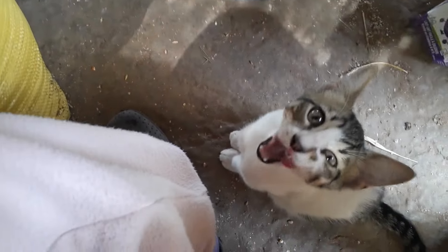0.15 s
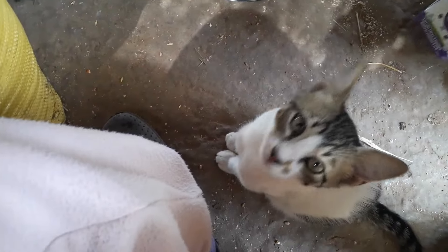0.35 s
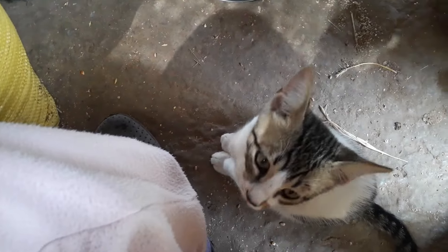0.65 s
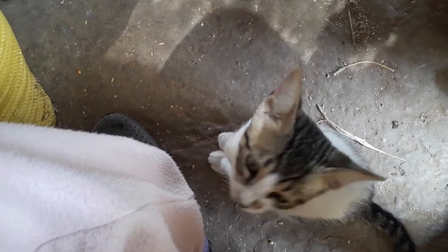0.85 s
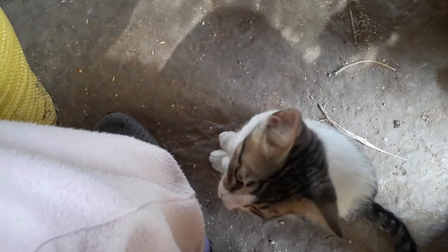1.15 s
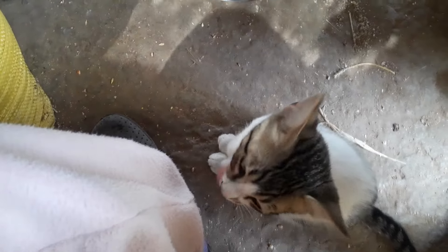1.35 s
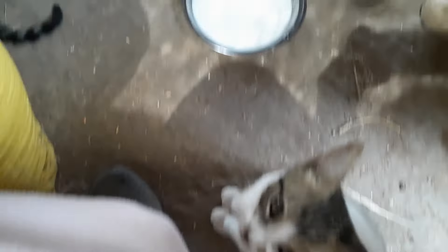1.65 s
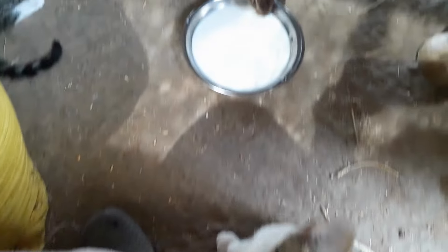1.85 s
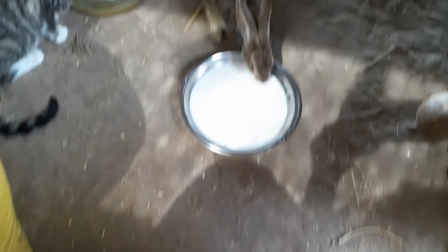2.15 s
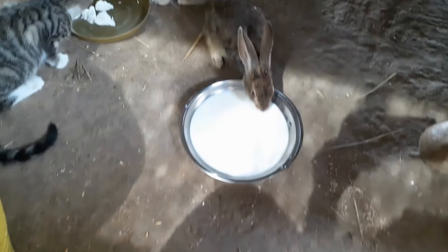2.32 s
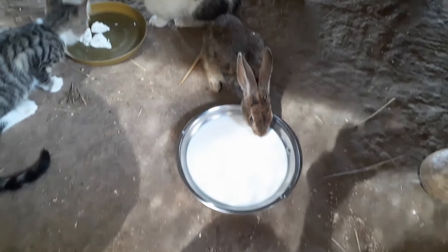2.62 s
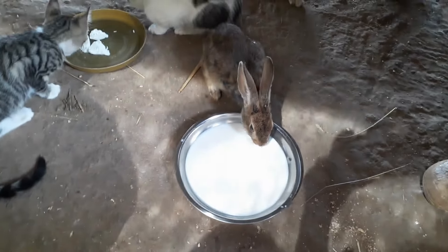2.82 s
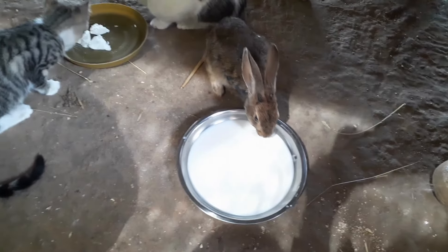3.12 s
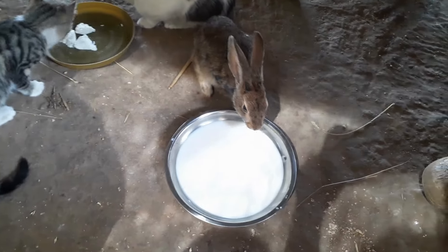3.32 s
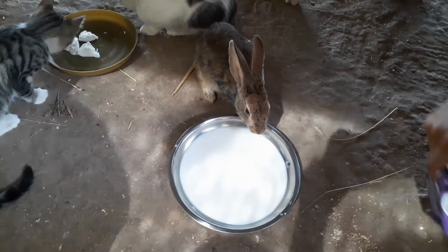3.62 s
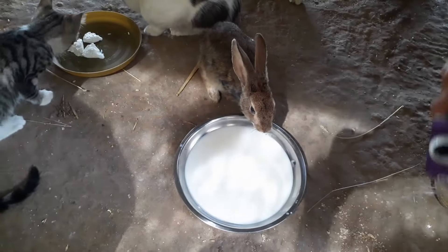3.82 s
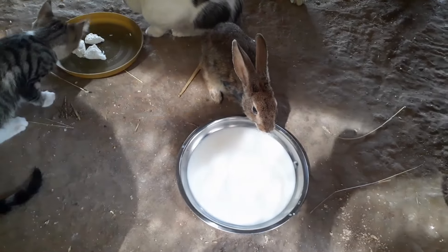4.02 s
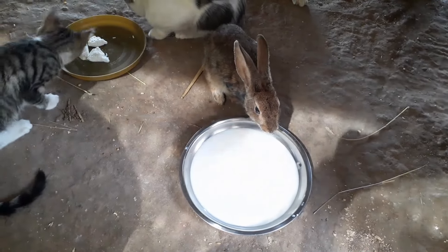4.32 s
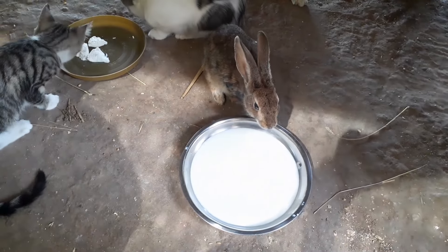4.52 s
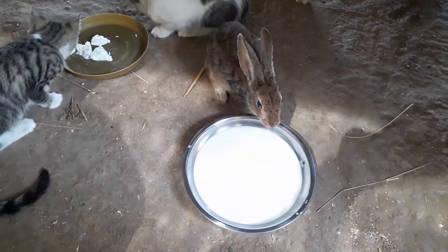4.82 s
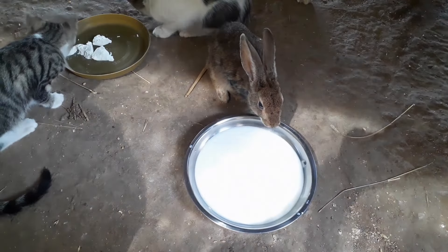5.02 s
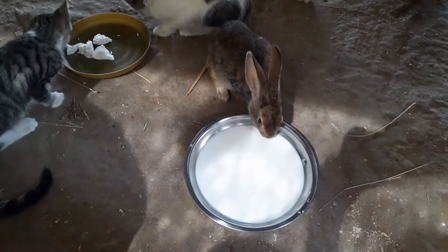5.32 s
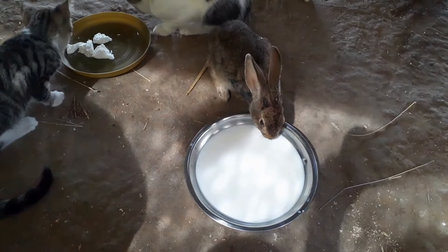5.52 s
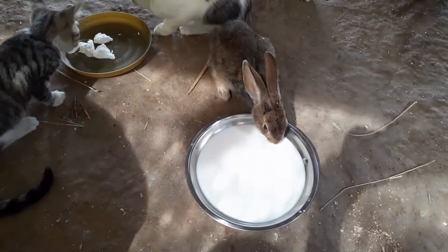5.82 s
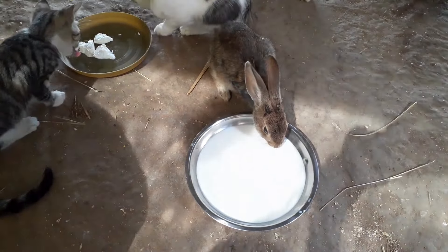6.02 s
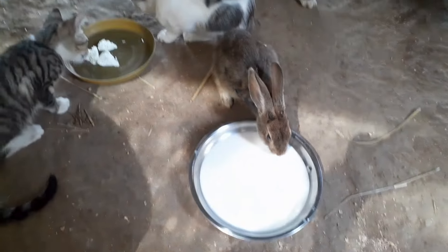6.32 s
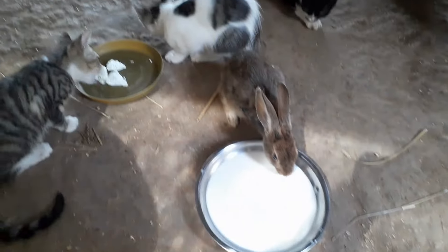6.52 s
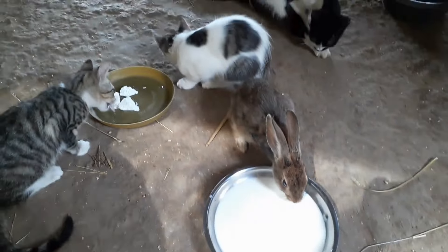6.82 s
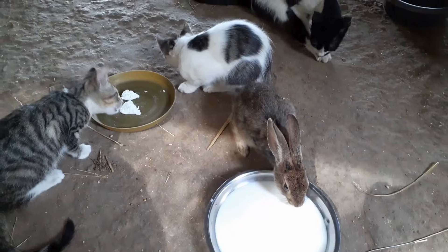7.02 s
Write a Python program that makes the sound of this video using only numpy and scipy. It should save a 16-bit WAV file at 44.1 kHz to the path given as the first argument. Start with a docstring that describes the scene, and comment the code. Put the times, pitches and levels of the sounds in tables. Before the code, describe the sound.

Over a distant motor's hum, cloth and straw rustle and something hollow is knocked, while a hen calls hoarsely, then clucks, and small birds chirp.

```python
"""A farm shed: a hen gives one long hoarse call and a few clucks, syrinx pulses and breath ringing in
her throat. Small birds chirp in bending notes and a motor hums far off. Close by, cloth and straw rustle
and tick, and something hollow is knocked. A hand covers the right microphone, so that side hears mostly
bass, bumps and finger taps."""
import sys
import numpy as np
from scipy import signal
from scipy.fft import rfft, irfft
from scipy.io import wavfile
from scipy.ndimage import uniform_filter1d

SR = 44100
rng = np.random.default_rng(int(sys.argv[2]) if len(sys.argv) > 2 else 0)


def to_wav(s):
    """Save 16-bit WAV."""
    ch = np.atleast_2d(s).T  # columns
    pcm = np.round(np.clip(ch, -1, 1) * 32767)  # PCM
    wavfile.write(sys.argv[1], SR, pcm.astype(np.int16))


N = 315756


def gain_of(db):
    """Decibels to amplitude factor."""
    return 10 ** (np.asarray(db) / 20)


def unit_rms(x):
    """Scales to rms 1."""
    return x / np.sqrt(np.mean(x ** 2) + 1e-20)


def colour(x, curve):
    """EQ through points of (frequency [Hz], gain [dB])."""
    points_hz, db = np.transpose(curve)
    hz = np.fft.rfftfreq(len(x), 1 / SR)
    eq_db = np.interp(np.log(hz + 1), np.log(points_hz + 1), db, db[0] - 42)
    return irfft(rfft(x) * gain_of(eq_db), len(x))


def automation(rows, whole=False):
    """One curve per column after the time, over the rows' own span or the whole scene."""
    times, *columns = np.transpose(rows)
    t = np.arange(N) / SR if whole else np.arange(times[0], times[-1], 1 / SR)
    return [np.interp(t, times, column) for column in columns]


def add(mix, start, sound):
    """Mixes a sound in at start seconds."""
    part = mix[round(start * SR):][:len(sound)]
    part += sound[:len(part)]


def resonate(x, hz, width):
    """Two resonances in series; each shifts hz down to zero, smooths and shifts back, so hz can glide."""
    carrier = np.exp(2j * np.pi * np.cumsum(hz * np.ones(len(x))) / SR)
    pole = np.exp(-np.pi * width / SR)
    for _ in range(2):
        x = 2 * (carrier * signal.lfilter([1 - pole], [1, -pole], x / carrier + 1e-18)).real
    return x


def wander(samples, seconds):
    """Random drift of rms 1, smoothed over the given time."""
    size = int(seconds * SR) + 1
    return unit_rms(uniform_filter1d(uniform_filter1d(rng.standard_normal(samples), size), size))


def patchy(x, depth_db):
    """Random patches of the spectrum briefly come forward or drop back."""
    spectrum = signal.stft(x, nperseg=256)[2]
    patches = rng.standard_normal(spectrum.shape)
    for axis in (0, 1, 0, 1):
        patches = uniform_filter1d(patches, size=9, axis=axis)
    return signal.istft(spectrum * gain_of(depth_db * unit_rms(patches)), nperseg=256)[1][:N]


def hen_voice(effort_db, hz, strain, beak, neck):
    """Syrinx pulses through the throat; strain makes them unsteady and drowns them in puffs of air."""
    # throat resonances with the beak open: (centre [Hz], width [Hz], gain [dB])
    formants = [(396, 73, -14), (618, 98, -11.5), (798, 99, -6.5), (1052, 75, -6.5), (1229, 49, 0.5),
                (1333, 113, -5.5)]
    # upper rasp, and airy resonance behind the beak: each (centre [Hz], width [Hz], gain [dB])
    rasp = (2130, 810, -31)
    breath = (1245, 220, -0.87)
    n = len(hz)
    cycles = np.cumsum(hz * (1 + (.007 + .022 * strain) * wander(n, .008))) / SR
    pulses = unit_rms(sum(np.cos(2 * np.pi * k * cycles) for k in range(1, 9)))
    puffs = unit_rms((0.14 + np.exp(-(cycles % 1) / 0.11)) * rng.standard_normal(n))
    drive = ((1 - strain) ** 1.2 * pulses + 1.6 * strain * puffs) * gain_of(3.5 * wander(n, .007))
    tremble = 1 + .011 * wander(n, .03)
    voice = 0
    for centre, width, db in formants:
        tuning = neck if centre < 900 else beak  # the neck moves the low resonances, the beak the rest
        voice += gain_of(db) * resonate(drive, centre * tremble * tuning, width)
    voice += strain * gain_of(rasp[2]) * resonate(drive, *rasp[:2])
    voice += strain ** 2 * gain_of(breath[2]) * resonate(puffs, *breath[:2])
    voice /= np.sqrt(uniform_filter1d(voice ** 2, size=1600) + 1e-12)  # levelled, so effort sets loudness
    return gain_of(effort_db) * voice * signal.windows.tukey(n, .05)


def long_call():
    """The hoarse call: the voice breaks as the beak snaps open, then the neck slowly stretches."""
    # the call's phrasing: (time [s], effort [dB], pitch [Hz], strain [0-1])
    phrase = [(1.2, -69.5, 340, 0.48), (1.3, -63, 338.2, 0.67), (1.37, -63.5, 335.5, 0.75),
              (1.445, -55, 338.9, 0.36), (1.5, -63, 351.6, 0.61), (1.545, -55, 350, 0.78),
              (1.57, -61, 346.2, 0.8), (1.6, -52.5, 349, 1), (1.64, -57, 347.7, 0.67),
              (1.765, -55.5, 363, 0.63), (1.79, -52, 344, 0.59), (1.87, -52.5, 345.3, 0.66),
              (2.03, -47.5, 348, 0.93), (2.09, -52.5, 346.4, 0.93), (2.125, -45.5, 348, 0.8),
              (2.185, -44.5, 348, 0.67), (2.225, -51.5, 349.5, 0.7), (2.27, -44.5, 349.6, 0.93),
              (2.3, -52.5, 343.6, 0.99), (2.325, -78, 346.6, 0.87)]
    start, tuning_before = phrase[0][0], .863
    effort_db, hz, strain = automation(phrase)
    t = start + np.arange(len(hz)) / SR

    def opening(at_s, glide_s):
        return tuning_before + (1 - tuning_before) * (1 + np.tanh((t - at_s) / glide_s)) / 2

    beak, neck = opening(at_s=1.785, glide_s=.002), opening(at_s=1.96, glide_s=.35)
    return start, hen_voice(effort_db, hz, strain, beak, neck)


def drawl():
    """A drawn-out cluck that ends as the beak shuts."""
    # its phrasing: (time [s], effort [dB], pitch [Hz], strain [0-1], beak opening [x resonances])
    phrase = [(5.625, -69, 479.5, 0.44, 0.85), (5.655, -54.5, 487.5, 0.3, 0.83),
              (5.675, -57, 510.4, 0.53, 0.87), (5.695, -58.5, 532.4, 0.2, 0.81),
              (5.73, -51, 502, 0.45, 0.78), (5.76, -58, 531.6, 0.36, 0.74), (5.812, -57, 528, 0.36, 0.81),
              (5.822, -52.5, 553, 0, 0.72), (5.87, -57, 552, 0.26, 0.75), (5.91, -71, 546, 0.1, 0.69)]
    effort_db, hz, strain, beak = automation(phrase)
    return phrase[0][0], hen_voice(effort_db, hz, strain, beak, neck=beak)


def clucks():
    """Short clucks: effort peaks once while the pitch slides."""
    # clucks: (start [s], length [s], effort [dB], start pitch [Hz], end pitch [Hz], strain [0-1],
    # beak opening [x resonances])
    notes = [(5.322, 0.039, -54.5, 378, 392, 0.46, 0.634), (5.338, 0.06, -56, 504.5, 478, 0.6, 0.797)]
    for start, length, db, start_hz, end_hz, strain, beak in notes:
        swell = [(start, db - 8.5), (start + 0.68 * length, db), (start + length, db - 27)]
        effort_db, = automation(swell)
        hz = np.linspace(start_hz, end_hz, len(effort_db))
        yield start, hen_voice(effort_db, hz, strain, beak, neck=beak)


def knocks():
    """Each blow rings the modes of a hollow body, retuned from hit to hit."""
    # blows: (time [s], level [dB], tuning [x mode frequencies])
    blows = [(0.059, -31.5, 1.02), (0.087, -35.5, 0.72), (0.154, -27, 1.014), (0.31, -41.5, 0.84),
             (2.27, -45, 1.1), (4.949, -44.5, 1.25), (5.749, -39.5, 1.22), (5.814, -37, 0.975),
             (6.005, -43, 0.67), (6.022, -37, 0.71), (6.572, -46, 1.094), (6.875, -40.5, 0.9)]
    # modes of the body: (frequency [Hz], level [dB], T60 [s])
    modes = [(157.3, 5.5, 0.079), (347, 9, 0.047), (561, -16, 0.082), (885, 4, 0.023), (1084, -16, 0.11),
             (2220, -14, 0.029)]
    out, t = np.zeros(N), np.arange(6000) / SR
    attack = np.sin(np.pi / 2 * np.minimum(t / 0.0019, 1)) ** 2
    for start, db, tuning in blows:
        ring = sum(gain_of(mode_db - 60 * t / t60) * np.sin(2 * np.pi * hz * tuning * t)
                   for hz, mode_db, t60 in modes)
        add(out, start, gain_of(db) * ring / abs(ring).max() * attack)
    return out


def ticks():
    """Cloth and straw snap: scratchy noise bursts, each around its own pitch, with a short tail."""
    # snaps: (time [s], level [dB], centre [Hz])
    snaps = [(0.0824, -44.5, 2200), (0.1096, -42.5, 11600), (0.287, -47.5, 8500), (0.2992, -45, 8060),
             (0.376, -46, 8950), (0.4204, -53, 6740), (0.4833, -48, 10300), (0.6474, -54, 3800),
             (0.693, -46, 6070), (0.849, -47, 12700), (.8977, -54, 8800), (1.024, -50, 3700),
             (1.2205, -51, 8400), (1.3682, -56, 4000), (1.453, -47.5, 2740), (1.491, -44.5, 4000),
             (2.9286, -51.5, 9100), (3.669, -47.5, 3700), (3.717, -37, 2720), (3.7613, -47, 4200),
             (3.7642, -39, 2470), (3.795, -40, 5040), (3.7968, -33, 2330), (3.8052, -38.5, 2500),
             (3.8245, -35.5, 2440), (3.8398, -44.5, 2150), (4.0632, -43.5, 2000), (4.385, -47, 4000),
             (4.4807, -45, 1770), (5.686, -51.5, 2880), (6.0055, -40, 3930), (6.064, -48, 3100),
             (6.096, -49.5, 1280)]
    out, t = np.zeros(N), np.arange(2500) / SR
    envelope = (gain_of(-60 * t / 0.014) + 0.1 * gain_of(-60 * t / 0.13)) * np.minimum(t / 0.0005, 1)
    for start, db, hz in snaps:
        snap = resonate(rng.standard_normal(len(t)) * envelope, hz, width=900 + 0.45 * hz)
        add(out, start, gain_of(db) * snap / abs(snap).max())
    return out


def stirring():
    """Gain curves of cloth and straw: a bed, plus single movements that swell and fade."""
    # continuous rustle: (time [s], cloth level [dB], straw level [dB])
    bed = [(0, -70, -74.5), (1.5, -75, -75.5), (2.2, -76.5, -82), (2.9, -79, -81), (3.5, -69, -66),
           (4.3, -75, -71.5), (5.1, -76, -77.5), (6.4, -74, -72.5), (7.16, -96, -79)]
    # movements: (loudest moment [s], length [s], cloth level [dB], straw level [dB])
    strokes = [(.005, 0.056, -64, -70), (0.085, 0.063, -62, -80), (0.322, 0.09, -68, -62),
               (0.403, 0.1, -61, -95), (0.502, 0.073, -60.5, -69.5), (0.698, 0.041, -56, -87),
               (0.891, 0.13, -60.5, -65.5), (1.28, 0.22, -68, -97), (1.491, 0.13, -66, -61),
               (1.649, 0.091, -68.5, -77), (2.594, 0.18, -75.5, -89), (3.377, 0.55, -66, -63),
               (3.75, .1, -75, -63), (3.808, 0.12, -52, -59), (4.14, 0.32, -65.5, -59.5),
               (4.4, 0.13, -72, -64.5), (4.633, 0.092, -73, -66.5), (5.24, 0.33, -75, -64),
               (5.793, 0.2, -70, -66.5), (6.019, 0.095, -62, -52), (6.084, 0.15, -67.5, -58),
               (6.488, 0.18, -69, -85), (6.878, 0.21, -72.5, -71.5), (7.155, 0.061, -65.5, -59)]
    rise_share, roundness = 0.48, 1.56  # roundness 1 is a pointed top, 2 a rounded one
    gains, t = gain_of(automation(bed, whole=True)), np.arange(N) / SR
    for peak, length, *levels_db in strokes:
        start = peak - rise_share * length
        off_peak = np.interp(t, [start, peak, start + length], [0.95, 0, 0.87], np.inf, np.inf)
        swell = gain_of(-18 * off_peak ** roundness)
        gains = np.hypot(gains, gain_of(levels_db)[:, None] * swell)
    return gains


def rustle():
    """Friction noise of cloth and straw, roughened by tiny scratching grains."""
    # spectra of crisp cloth and duller straw: (frequency [Hz], level [dB])
    cloth_eq = [(2500, -14), (4500, -2.5), (6500, -7.5), (9000, 1), (12000, -2.5), (16000, -10)]
    straw_eq = [(300, -6.5), (700, -4), (1500, -3), (2500, -5.5), (4500, -12.5), (7000, -17.5),
                (12000, -67)]
    grains_per_s, grain_decay_s = 250, 0.0015
    out = np.zeros(N)
    for eq, gain in zip((cloth_eq, straw_eq), stirring()):
        strength = gain_of(5 * np.minimum(rng.exponential(1, N), 4))
        grains = strength * (rng.random(N) < grains_per_s / SR)
        crackle = signal.lfilter([1], [1, -np.exp(-1 / (grain_decay_s * SR))], grains)
        friction = (1 + 0.33 * unit_rms(crackle)) * rng.standard_normal(N)
        friction *= gain_of(1.24 * wander(N, 0.022))
        out += gain * unit_rms(patchy(colour(friction, eq), depth_db=2.2))
    return out


def hand_bumps():
    """Dull pushes of air under the hand: low-passed noise that swells and dies."""
    # pushes: (crest time [s], level [dB], brightness [Hz])
    pushes = [(1.689, -36, 235), (1.979, -42.5, 261.5), (2.121, -42.5, 199), (2.411, -39, 119.7),
              (3.321, -44, 243), (3.601, -48, 235), (6.38, -44.5, 150), (6.499, -43, 211),
              (6.771, -49, 202)]
    out, t = np.zeros(N), np.arange(8000) / SR
    for crest, db, hz in pushes:
        eq = [(35, -10), (60, 0), (hz, -8), (2.56 * hz, -32), (8 * hz, -60)]
        air = unit_rms(colour(rng.standard_normal(len(t)), eq))
        rise = 2.7 / hz  # brighter bumps are quicker
        add(out, crest - rise, gain_of(db) * air * (t / rise) * np.exp(1 - t / rise))
    return out


def finger_taps():
    """A finger taps by the right microphone: short thuds with a hard attack."""
    # taps: (time [s], level [dB])
    thuds = [(2.813, -39), (2.856, -30.5), (2.886, -42)]
    thud_hz, t60_s = 231, 0.017
    out, t = np.zeros(N), np.arange(3000) / SR
    for start, db in thuds:
        add(out, start, -gain_of(db - 60 * t / t60_s) * np.sin(2 * np.pi * thud_hz * t))
    return out


def chirps_and_cluck_overtones():
    """Each note is a trembling sine on one pitch bend; hoarse ones blur into a band of noise."""
    # bird chirps, plus the hoarse overtones of one short hen cluck near 2.57 s:
    # (start [s], length [s], level [dB], hoarseness [0 pure, about 1 all noise],
    # start pitch [Hz], middle pitch [Hz], end pitch [Hz])
    notes = [(0.42, 0.081, -70, 0.7, 3430, 3830, 4250), (0.589, 0.11, -63.5, 0.42, 3880, 3466, 2720),
             (0.701, 0.06, -64.5, 0.9, 2870, 3050, 2950), (0.826, 0.037, -65, 0.2, 1360, 1420, 1350),
             (1.203, 0.27, -72, 0.77, 3340, 3180, 2660), (1.491, 0.15, -69.5, 0.7, 4000, 4530, 3540),
             (1.733, 0.14, -64.5, 0.65, 3740, 3360, 3210), (1.85, .26, -72.5, 0.27, 3370, 3345, 3400),
             (2.102, 0.046, -65, 0.36, 3590, 3704, 3250), (2.142, 0.051, -63, 0, 3340, 3365, 3535),
             (2.182, 0.063, -63, 0.01, 3388, 3860, 3220), (2.363, 0.043, -68, 0.06, 3750, 4000, 3860),
             (2.397, 0.063, -65, 0.17, 3970, 3870, 3580), (2.453, 0.057, -67.5, 0.02, 3690, 4040, 2710),
             (2.57, 0.024, -65, 1.07, 1770, 1680, 1600), (2.558, 0.067, -70.5, 1.1, 2680, 2660, 2840),
             (2.722, 0.12, -73, 0.85, 1966, 1990, 2020), (2.954, 0.074, -73.5, 0.6, 4000, 3950, 4010),
             (3.133, 0.12, -77, 0.6, 1990, 2100, 2220), (3.115, 0.052, -66, 1.02, 1040, 1050, 1050),
             (3.105, 0.069, -67.5, 0.03, 4200, 4660, 3600), (3.187, 0.18, -72.5, 0.68, 3430, 3180, 2980),
             (3.549, 0.19, -65.5, 0.12, 4360, 4100, 3805), (4.438, 0.125, -68.5, 0.2, 3700, 3860, 4220),
             (4.541, 0.069, -70, 0.2, 4620, 4480, 4330), (4.58, 0.066, -58, 0.61, 4260, 3980, 3800),
             (4.631, 0.1, -61, 0.38, 3250, 3090, 2605), (4.705, 0.15, -69.5, 0.07, 3700, 3870, 3630),
             (4.842, 0.045, -66, 0.07, 4240, 4000, 3750), (4.868, 0.18, -63.5, 0.23, 3825, 3586, 3635),
             (5.015, 0.15, -68.5, 0.54, 3270, 3026, 2970), (6.187, 0.25, -73.5, 0.17, 2076, 2476, 2200),
             (6.545, 0.2, -67.5, 0.25, 2150, 2480, 2380), (6.625, 0.095, -68, 0.3, 2336, 2300, 2320),
             (6.619, 0.076, -78, 0, 3270, 3290, 3270)]
    out = np.zeros(N)
    for start, length, db, hoarse, start_hz, middle_hz, end_hz in notes:
        n = round(length * SR)
        u = np.linspace(-1, 1, n)
        hz = middle_hz + (end_hz - start_hz) / 2 * u + ((start_hz + end_hz) / 2 - middle_hz) * u ** 2
        cycles = np.cumsum(hz * (1 + (.006 + .02 * hoarse) * wander(n, .003))) / SR
        hoarse = min(hoarse, 1)
        blur = unit_rms(resonate(rng.standard_normal(n), hz, width=70 + 300 * hoarse ** 2))
        voice = (1 - hoarse) * np.sqrt(2) * np.sin(2 * np.pi * cycles) + hoarse * blur
        add(out, start, gain_of(db + 4 * wander(n, .009)) * voice * signal.windows.tukey(n, .4))
    return out


def motor():
    """A far motor: wavering shaft orders in a lumpy rumble, partly alike at both microphones."""
    # shaft orders: (centre [Hz], width [Hz], relative level [dB])
    orders = [(86.1, 11.5, -8.5), (170.9, 12.5, -10), (259.5, 14.5, -20)]
    # rumble spectrum: (frequency [Hz], level [dB])
    rumble_eq = [(25, -28), (40, -7), (60, 1), (90, 2.5), (140, -8), (200, -11), (280, -19), (420, -30),
                 (700, -70)]
    # level and pan of the motor: (time [s], level [dB], left over right [dB])
    fader = [(0, -47, 3.7), (1.3, -50, 6), (1.75, -45.5, 2), (2.45, -47.5, 0.56), (3.3, -49.5, 2.2),
             (3.9, -49.5, 4), (4.2, -55.5, 9.7), (6.2, -54.5, 16.2), (6.48, -48.5, 8.3), (6.65, -53, 13.2),
             (7.16, -52.5, 10.5)]
    level_db, pan_db = automation(fader, whole=True)
    correlation = 0.4
    left, right = rng.standard_normal((2, N))
    right = correlation * left + np.sqrt(1 - correlation ** 2) * right
    out = []
    for noise, side, rumble_db in ((left, .5, 0.9), (right, -.5, 5.1)):
        hum = sum(gain_of(db) * unit_rms(resonate(noise, hz, width)) for hz, width, db in orders)
        rumble = gain_of(rumble_db) * unit_rms(colour(noise, rumble_eq))
        out.append(unit_rms(hum + rumble) * gain_of(level_db + side * pan_db))
    return np.array(out)


def yard():
    """Faint outdoor ambience: noise that shifts in colour and level."""
    # ambience spectrum: (frequency [Hz], level [dB])
    yard_eq = [(200, -3.5), (300, 4.5), (500, -0.5), (800, -7), (1000, -20), (3900, -19.5), (4800, -34),
               (7700, -38), (8400, -17.5), (11000, -35.5), (15800, -22.5)]
    air = patchy(colour(rng.standard_normal(N), yard_eq), depth_db=2.45)
    return unit_rms(air) * gain_of(-68.5 + 2.2 * wander(N, .07))


def hiss():
    """Steady hiss of the right microphone."""
    # hiss spectrum: (frequency [Hz], level [dB])
    hiss_eq = [(300, -12), (700, -8.5), (1500, -13.5), (4000, -18.5), (7500, -29), (11000, -18.5),
               (14000, -14), (16000, -17.5)]
    return gain_of(-77) * unit_rms(colour(rng.standard_normal(N), hiss_eq))


def shed_echo(x, wet_db, t60_s):
    """Reflections in the shed: sparse echoes of random sign dying away."""
    impulse = np.zeros(SR // 2)
    delays = np.arange(300, len(impulse) - 20, 20)
    delays += rng.integers(0, 20, len(delays))
    impulse[delays] = rng.choice([-1., 1.], len(delays)) * gain_of(-60 * delays / SR / t60_s)
    return gain_of(wet_db) * signal.oaconvolve(x, impulse / np.linalg.norm(impulse))[:N]


def scene():
    """The left microphone is open, the right muffled by the hand; the motor's bass reaches both."""
    # muffling by the hand: (frequency [Hz], gain [dB])
    cover_eq = [(60, -5), (200, -10.5), (400, -32), (900, -32), (1300, -24.5), (1600, -37), (4000, -81),
                (16000, -24)]
    hen = np.zeros(N)
    for start, voice in (long_call(), drawl(), *clucks()):
        add(hen, start, voice)
    birds, hits, ambience = chirps_and_cluck_overtones(), ticks() + knocks(), yard()
    left = gain_of(-3) * birds + shed_echo(birds, wet_db=-10, t60_s=0.17)
    left += hen + shed_echo(hen, wet_db=-6, t60_s=0.18)
    left += hits + shed_echo(hits, wet_db=-5.5, t60_s=0.2)
    left += rustle() + ambience
    left *= gain_of(3)  # lift of the uncovered side
    hand = hand_bumps() + finger_taps()
    right = colour(np.roll(left, 30), cover_eq) + hand + hiss()
    left += colour(hand, [(30, -2), (80, -7.5), (300, -40)])  # only the hand's low end bleeds across
    return np.array([left, right]) + motor()


def record(dry):
    """The microphones drop the deepest bass; the recorder cuts the very top."""
    low_cut_hz, high_cut_hz = 38, 15900
    thinned = signal.sosfilt(signal.butter(4, low_cut_hz, "high", fs=SR, output="sos"), dry)
    lowpass = signal.firwin(1023, high_cut_hz, window=("kaiser", 9), fs=SR)
    return signal.oaconvolve(thinned, lowpass[None], "same")


dry = scene()
out = record(dry)
to_wav(out)
```